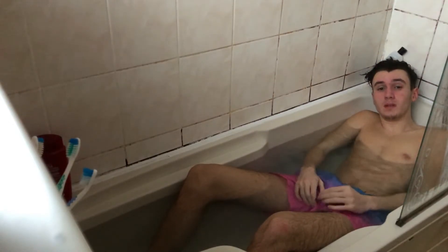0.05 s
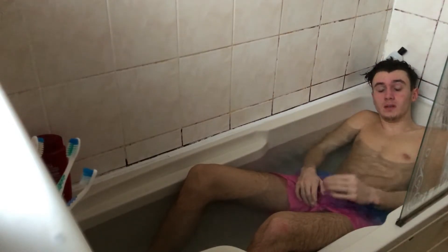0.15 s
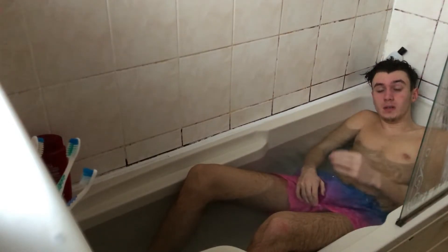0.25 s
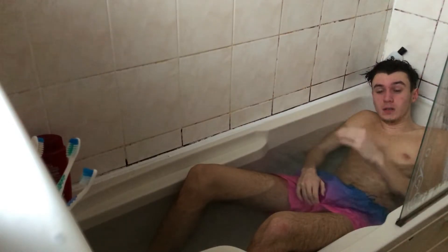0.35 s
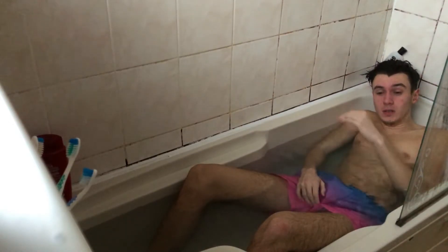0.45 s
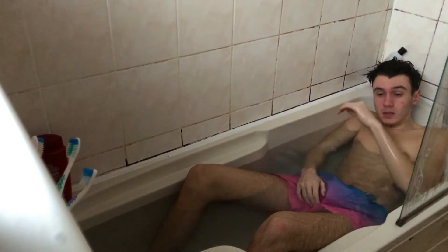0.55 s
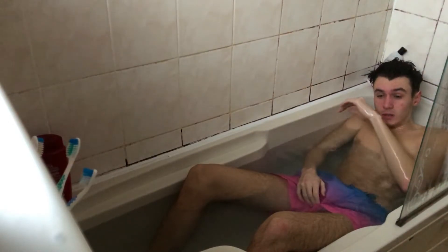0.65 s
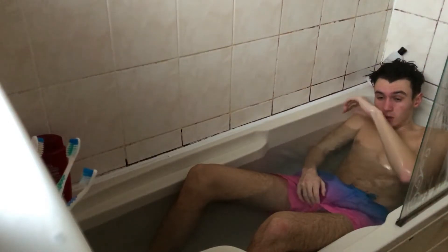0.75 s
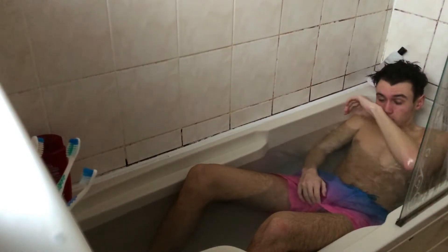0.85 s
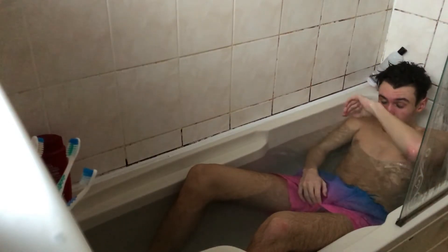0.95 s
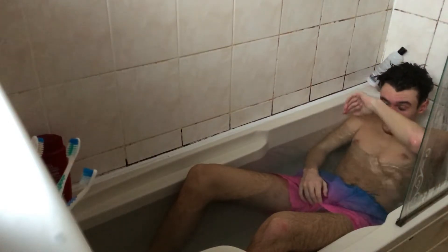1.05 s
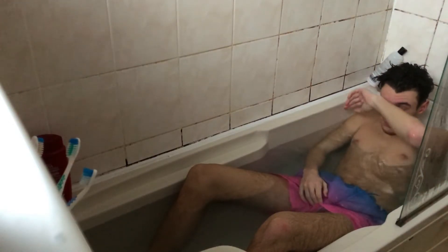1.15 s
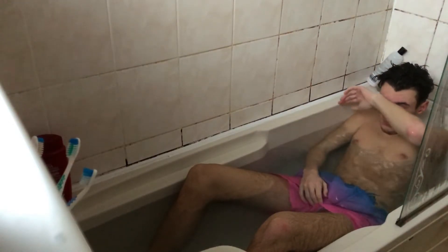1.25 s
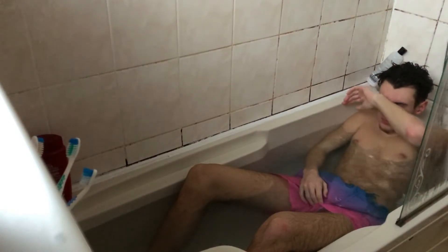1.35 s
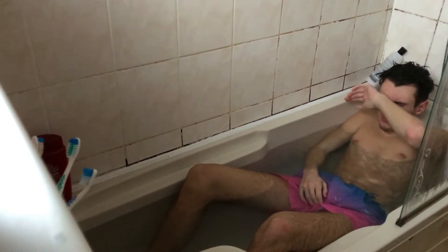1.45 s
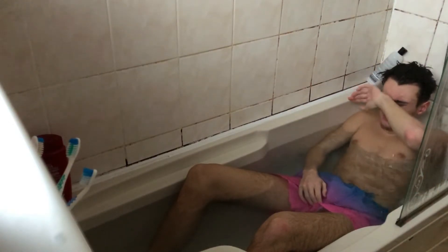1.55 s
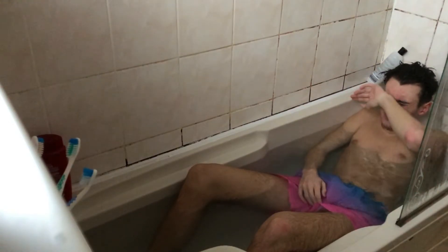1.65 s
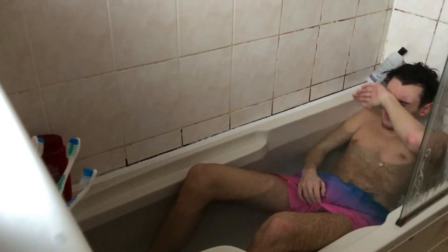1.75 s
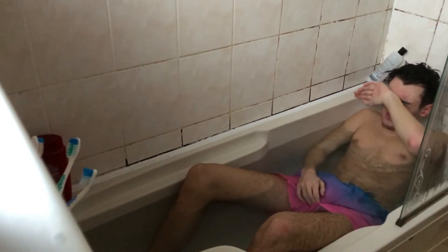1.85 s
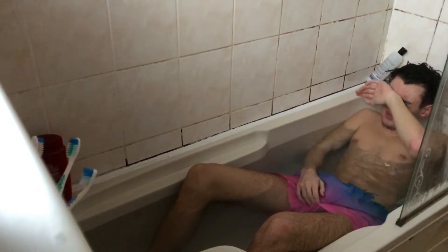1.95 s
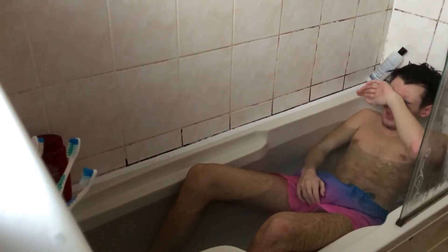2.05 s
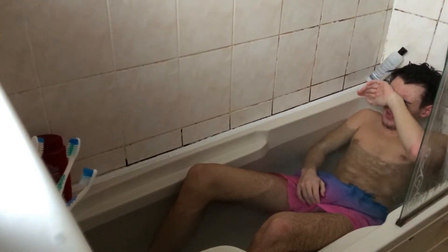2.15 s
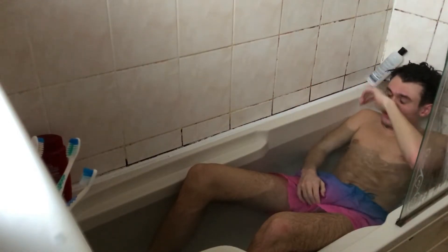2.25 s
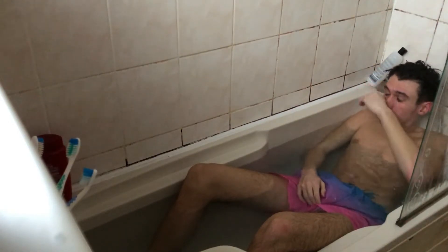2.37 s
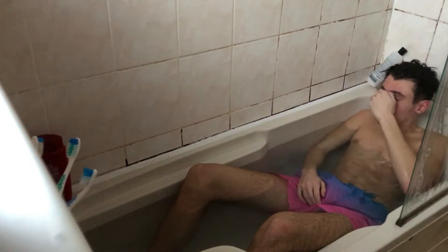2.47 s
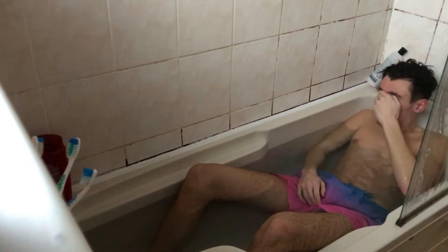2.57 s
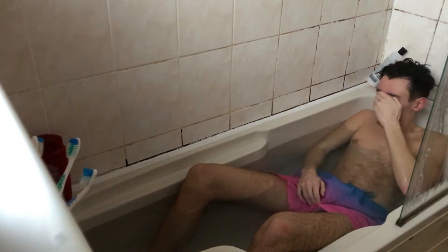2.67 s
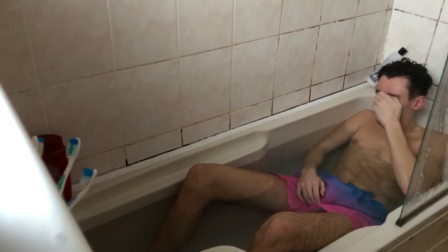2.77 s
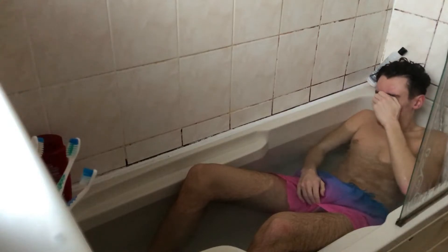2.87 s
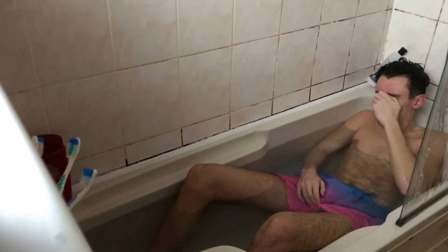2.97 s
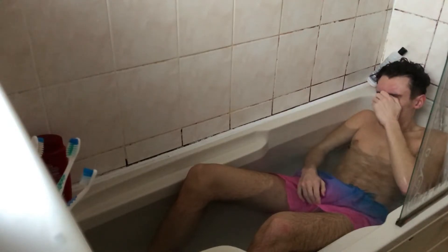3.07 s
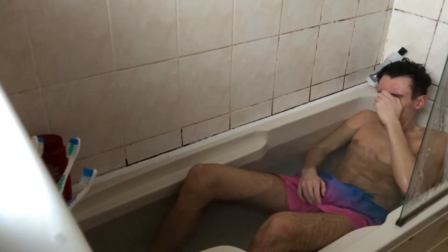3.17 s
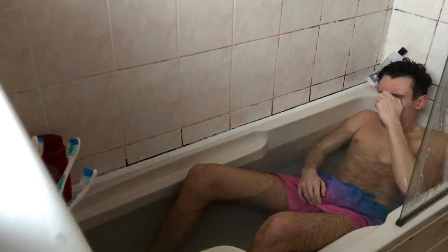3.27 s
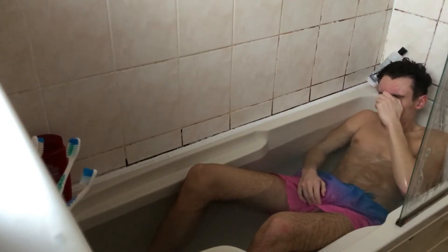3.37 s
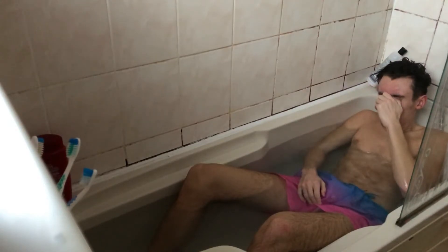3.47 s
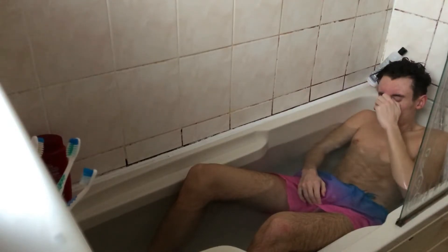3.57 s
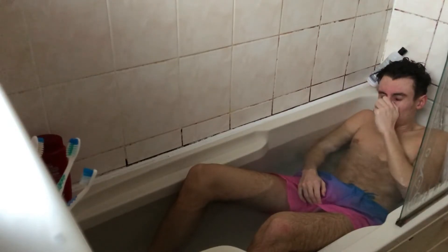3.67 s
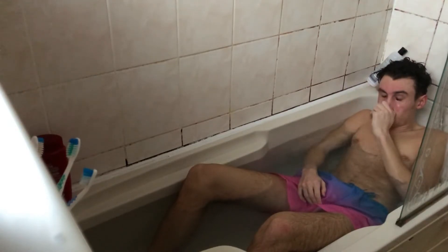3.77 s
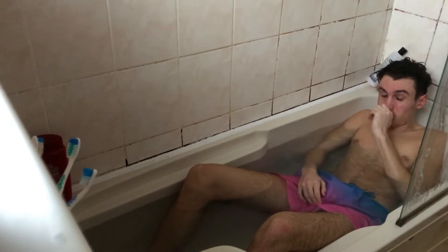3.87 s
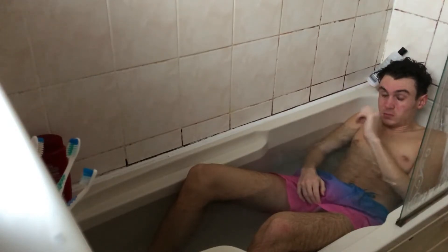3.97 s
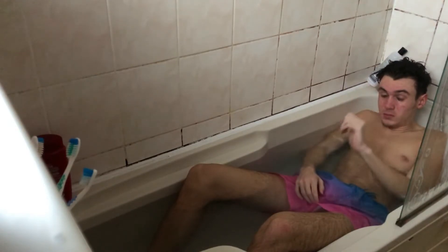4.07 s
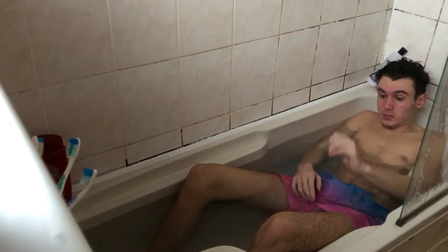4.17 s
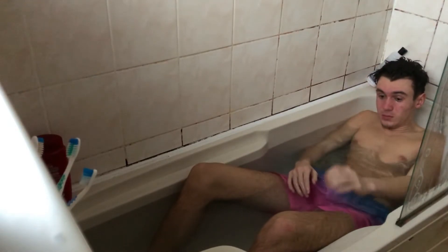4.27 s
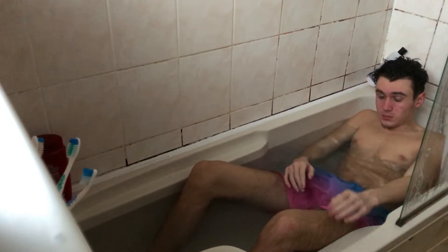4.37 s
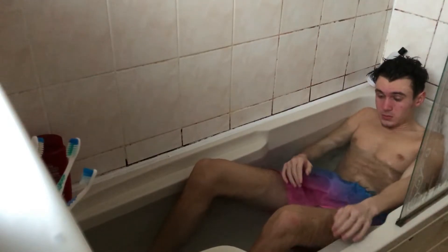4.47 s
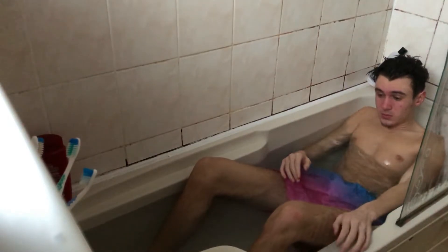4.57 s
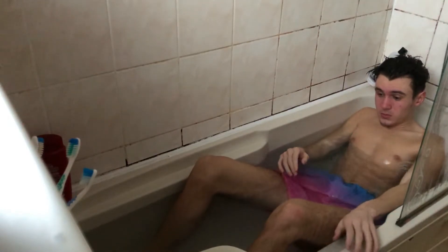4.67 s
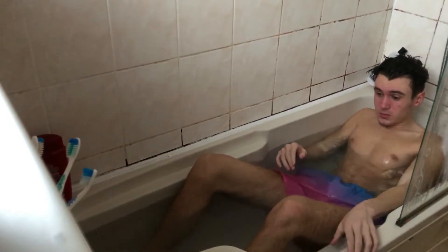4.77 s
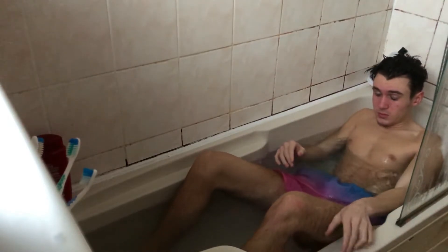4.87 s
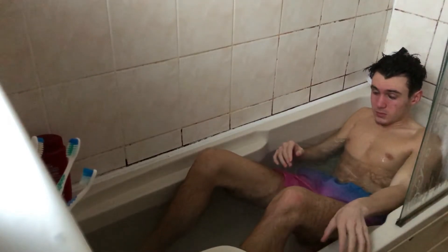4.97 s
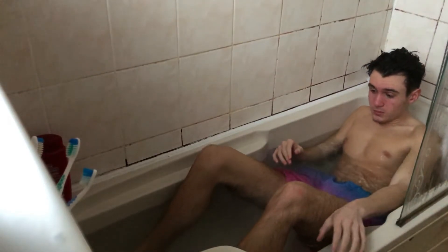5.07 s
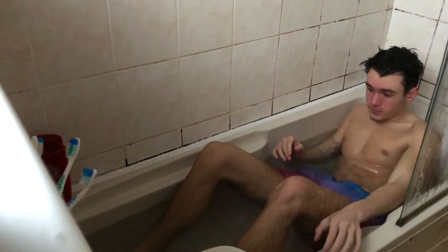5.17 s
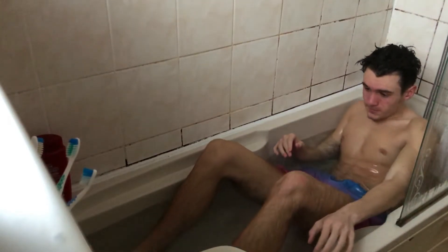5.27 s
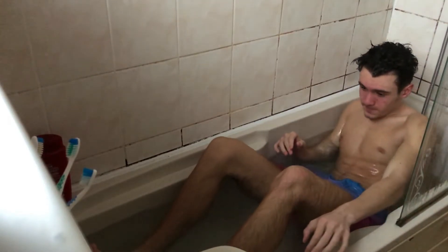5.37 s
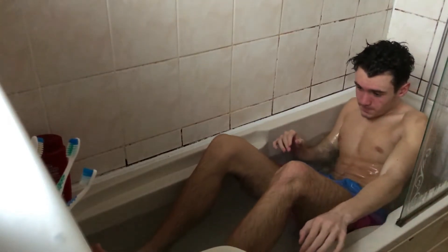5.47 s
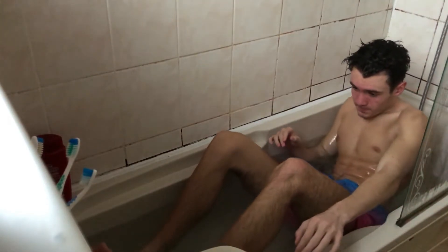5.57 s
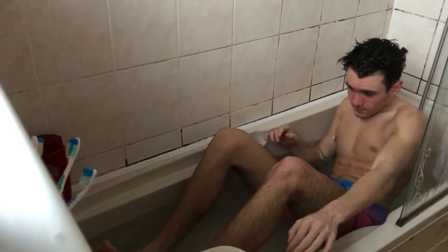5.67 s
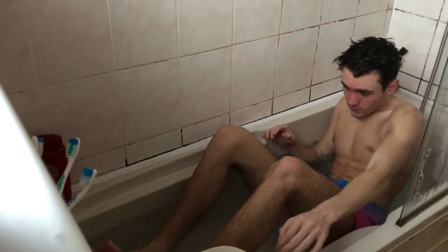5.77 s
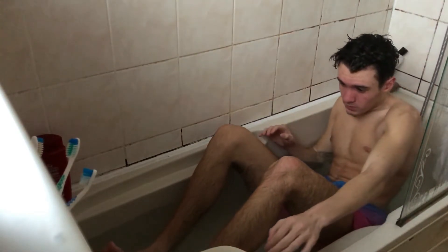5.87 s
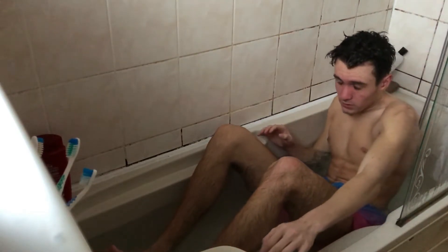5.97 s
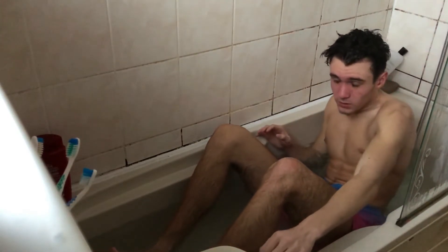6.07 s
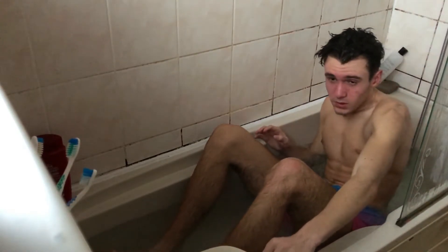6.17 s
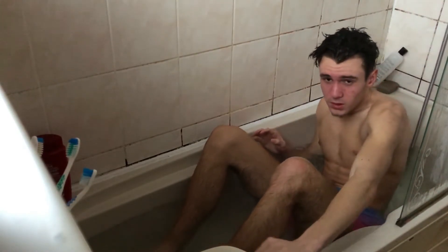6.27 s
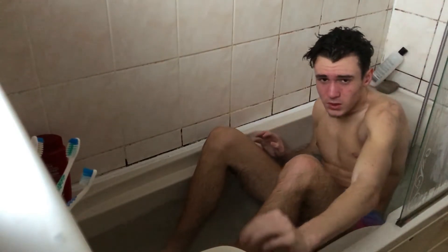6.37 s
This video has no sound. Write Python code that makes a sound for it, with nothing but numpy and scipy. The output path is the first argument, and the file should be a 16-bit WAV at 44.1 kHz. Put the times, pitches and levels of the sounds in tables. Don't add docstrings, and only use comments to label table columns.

```python
import sys
import numpy as np
from scipy import signal
from scipy.fft import rfft, irfft, next_fast_len
from scipy.io import wavfile
from scipy.ndimage import map_coordinates

SR = 44100
rng = np.random.default_rng(int(sys.argv[2]) if len(sys.argv) > 2 else 0)


def generate_wav(sig):
    pcm = np.round(np.clip(np.atleast_2d(sig).T, -1, 1) * 32767).astype(np.int16)
    wavfile.write(sys.argv[1], SR, pcm)


def elevation(decibels):
    levels = np.asarray(decibels, float)
    return 10 ** (levels / 20)


N = 283122


def drips():
    # [t/s, peak level/dB, f/Hz, life/cycles]
    plops = [(0.056, -43.5, 1147, 18), (0.118, -43.5, 1180, 12), (0.253, -45.5, 2010, 11),
             (0.408, -35.5, 1190, 15), (0.476, -39.5, 1047, 23), (0.533, -43.5, 1052, 39),
             (0.99, -45, 896, 11), (1.34, -48.5, 1867, 29), (1.399, -44.5, 980, 5.9),
             (2.52, -56.5, 1425, 15), (3.764, -55, 1820, 13), (4.131, -28, 1394, 6.8),
             (4.249, -40.5, 1250, 22), (4.341, -45, 586, 20), (4.545, -48.5, 753, 12.5),
             (4.62, -50, 760, 9.2), (4.684, -48, 782, 26), (4.798, -42, 1228, 18), (4.859, -46, 531, 13),
             (5.199, -41, 688, 6.3), (5.237, -41.5, 864, 14), (5.575, -52.5, 1810, 31),
             (5.65, -58, 1210, 21), (5.76, -40.5, 1726, 19), (5.826, -47.5, 736, 11),
             (5.86, -38, 1167, 7.9), (5.98, -48.5, 1040, 18), (6.218, -39, 974, 18),
             (6.367, -45, 900, 10.3), (6.393, -43, 730, 12)]
    plinks = [(0.0312, -55, 6200, 12), (0.094, -39.5, 3430, 19), (0.251, -43, 2390, 12.4),
              (0.3071, -41, 3250, 17), (0.352, -43, 3800, 10), (0.3957, -42, 2660, 18),
              (0.562, -40.5, 2130, 14), (0.594, -30.5, 3260, 9.7), (0.6453, -26.5, 3470, 14.2),
              (0.664, -38, 3500, 10), (1.1367, -64, 2100, 22), (1.339, -44, 5200, 18),
              (1.433, -44.5, 6870, 20), (1.634, -55, 3720, 12), (1.6524, -42.5, 5340, 10.5),
              (1.76, -49.5, 4460, 8.9), (1.937, -56, 5500, 14), (2.37, -52, 4520, 12),
              (2.447, -53, 2860, 7.5), (2.504, -41.5, 6070, 14), (2.5387, -51, 4600, 11),
              (3.089, -65, 3400, 16), (3.747, -54, 3480, 11), (3.764, -51, 3610, 12)]
    runoff = [(4.0573, -46.5, 6070, 15), (4.1095, -56, 2950, 11), (4.1246, -32.5, 3930, 19),
              (4.4405, -41.5, 2410, 4.7), (4.56, -43, 3340, 11), (4.585, -35.5, 2790, 11.5),
              (4.599, -38, 3220, 16), (4.681, -42, 2760, 12), (4.859, -47, 4400, 18),
              (4.9836, -48.5, 5730, 15), (5.0588, -50, 3100, 4.4), (5.236, -42, 2750, 17),
              (5.54, -49.5, 3500, 23), (5.6508, -43, 3160, 10.3), (5.7553, -38, 2460, 8.2),
              (5.777, -38.5, 5050, 23), (5.872, -42, 2240, 26), (6.03, -52, 3920, 20),
              (6.213, -45, 3230, 21), (6.331, -56, 2600, 13)]
    hidden = [(.435, -43, 657, 8.9), (.632, -32.5, 1359, 25), (.634, -33, 766, 32.5),
              (.668, -34.5, 5050, 14), (1.057, -57.5, 1760, 24), (1.2, -61, 3500, 15),
              (1.65, -37.5, 651, 29), (1.653, -44, 1900, 6.8), (2.048, -49.5, 5500, 13),
              (3.8, -67, 1870, 8), (4.124, -31.5, 4740, 7), (4.133, -35.5, 1850, 7.9),
              (4.185, -42, 5600, 7.2), (4.19, -46, 760, 13), (4.573, -39, 4050, 9.1),
              (5.2366, -45, 1930, 17), (5.3, -46, 580, 11), (5.575, -46.5, 5100, 12), (5.61, -47, 6100, 14),
              (5.63, -50, 233, 10.5), (5.652, -38.5, 5100, 5.2), (5.767, -50.5, 3500, 29),
              (6.344, -43.5, 4380, 13), (6.388, -32, 246, 6.3)]
    patter = [(0.068, -46, 1070, 11.5), (.15, -50, 4700, 16), (0.4466, -43.5, 1125, 18),
              (.472, -49, 3700, 12), (0.489, -46, 2270, 14), (.585, -36, 2770, 13.6),
              (.615, -50, 2800, 9.2), (.627, -43, 3500, 11), (.679, -31, 3380, 13), (1.344, -44, 4540, 17),
              (1.341, -44, 6250, 14), (1.414, -46, 850, 5.2), (1.424, -55, 694, 6.3),
              (1.666, -46.5, 673, 25), (1.684, -45, 632, 38), (2.478, -53, 4170, 14),
              (2.522, -52, 4500, 12), (4.083, -57.5, 1980, 14), (4.209, -44, 3380, 13),
              (4.245, -41, 2180, 8.1), (4.585, -46.5, 7350, 14), (4.618, -46, 3120, 15),
              (4.692, -47, 1040, 9.2), (4.826, -44, 820, 16), (5.02, -52, 600, 9.3), (5.075, -48, 700, 9),
              (5.212, -37.5, 767, 6.2), (5.225, -38, 700, 6), (5.2202, -43, 2080, 6.7),
              (5.2344, -42, 1670, 17), (5.245, -37, 3010, 16), (5.256, -42, 876, 15.5),
              (5.258, -38.5, 2090, 9.5), (5.262, -48, 3830, 15), (5.28, -45, 4800, 16),
              (5.294, -53, 920, 14), (5.297, -44, 2300, 14), (5.335, -60, 945, 8.4), (5.365, -43, 3770, 20),
              (5.43, -46, 4900, 14), (5.506, -55, 1850, 13), (5.663, -48.5, 3900, 14),
              (5.678, -48, 3050, 14), (5.782, -40, 2750, 6.7), (5.79, -44, 5930, 13),
              (5.839, -41, 4790, 15), (5.8739, -39.5, 1177, 11), (5.927, -49, 4800, 22),
              (5.944, -45, 2600, 6.3), (6.02, -54, 2280, 13)]
    scattered = [(.06, -44.5, 4600, 6.6), (.098, -50, 3150, 20), (.128, -55, 3400, 16), (.15, -55, 2150, 14),
                 (.16, -50, 3330, 14), (.175, -53, 2600, 14), (.2, -53, 1510, 12), (.215, -61, 1250, 8.3),
                 (.272, -55, 3950, 12), (0.329, -54, 2830, 14), (.385, -47, 6700, 8.7),
                 (.632, -31.5, 5800, 10), (.643, -44, 3080, 11), (0.651, -40, 3900, 10),
                 (.665, -40, 1020, 18), (.69, -37, 3850, 12), (0.726, -44, 3200, 12), (.74, -41, 3700, 15),
                 (.755, -48, 3450, 12), (1.338, -50, 7400, 12), (1.343, -50.5, 3480, 33),
                 (1.352, -44.5, 3930, 14), (1.432, -57, 3340, 22), (1.908, -67, 2400, 10),
                 (2.582, -47, 2810, 9.3), (3.74, -58, 1730, 11), (3.769, -50, 2500, 8), (3.78, -61, 3020, 8),
                 (3.855, -57, 2600, 4.7), (4.113, -54, 4200, 10), (4.134, -44, 830, 4.5),
                 (4.16, -41, 955, 7), (4.19, -44, 3900, 14), (4.205, -50, 900, 8), (4.282, -47, 1305, 31),
                 (4.646, -46.5, 870, 11), (4.683, -35, 4500, 3.3), (4.719, -50.5, 1780, 12),
                 (4.75, -52, 2960, 16), (4.87, -44, 1050, 8.1), (4.912, -50, 2770, 6.7),
                 (4.918, -48, 1146, 11), (4.941, -54, 1080, 11), (5.056, -46.5, 1660, 7.8),
                 (5.795, -44, 3550, 15), (5.956, -48, 2120, 13), (6.128, -51, 3700, 10),
                 (6.28, -48.5, 1027, 30)]
    lone = [
        (1.056, -57, 2820, 26),
        (1.135, -57, 3520, 22),
        (1.199, -59, 3130, 34),
    ]
    # [t/s, peak level/dB, f/Hz]
    ticks = [(0.0467, -38, 12700), (0.172, -33, 14800), (0.402, -43, 12700), (0.575, -50, 7790),
             (0.8918, -36, 11500), (1.277, -39, 14100), (1.3592, -34, 12300), (1.7167, -35, 9000),
             (1.871, -39.5, 9250), (1.923, -39, 12100), (2.354, -32.5, 10200), (3.3936, -62, 13800),
             (3.559, -52, 11300), (4.0878, -37, 14100), (4.125, -35.5, 11500), (4.345, -18, 14800),
             (4.572, -45, 7400), (4.7552, -40, 8400), (5.0402, -35.5, 7300), (5.539, -47, 8930),
             (5.7581, -38.5, 7320), (5.9448, -44, 9250), (5.9657, -47, 8250), (5.9874, -38.5, 10300),
             (6.1508, -36, 11900), (6.2137, -39, 9400), (6.2775, -49, 7000), (6.3628, -43, 11500)]

    tick_cycles, heavy_hz, spots = 8.5, 400, 5
    droplets = np.insert(np.array(ticks, float), 3, tick_cycles, axis=1)
    rows = np.vstack([plops, plinks, runoff, droplets, hidden, patter, scattered, lone])
    s, db, hz, cycles = rows.T
    rise = 12 * 0.014 * (12 / cycles) / (1 + (heavy_hz / hz) ** 4)
    rows = np.column_stack([s, db, hz, rise, cycles])
    return sum(tiles(bubbles(rows[k::spots], size=3000), 2.5, 4) for k in range(spots))


def sweeps():
    # [t/s, peak level/dB, first f/Hz, last f/Hz, length/s]
    cavities = [
        (0.587, -37, 2940, 3650, 0.0046),
        (1.651, -43.5, 640, 940, 0.0316),
        (2.009, -40.5, 1136, 3430, .059),
        (2.58, -46, 2476, 3390, 0.012),
        (4.5985, -35.5, 2660, 4752, 0.0053),
    ]
    held_per_s, thins_db = 5.2, 11.5
    dry = np.zeros(N)
    for s, db, first_hz, last_hz, length_s in cavities:
        u = np.linspace(0, 1, round(length_s * SR))
        held = held_per_s * length_s
        shrunk = np.clip((u - held) / (1 - held), 0, 1)
        hz = first_hz * (last_hz / first_hz) ** shrunk ** 1.2
        strength = elevation(db - thins_db * np.sqrt(shrunk)) * signal.windows.tukey(len(u), .2)
        dry[round(s * SR):][:len(u)] += strength * np.sin(2 * np.pi * np.cumsum(hz) / SR)
    return tiles(dry, 1.4, 0.89, loss_db=6.5)


def slaps():
    # [t/s, peak level/dB, dull share/0-1]
    sheets = [(0.057, -36.5, 0.5), (0.405, -31.5, 0.53), (0.5955, -24.5, 0.26), (0.634, -22.5, 0.45),
              (1.335, -39, 0.01), (1.403, -42, 0.6), (1.6497, -33, 0.38), (2.0092, -31, 0.79),
              (2.455, -41.5, 0.01), (3.764, -57, 0.4), (4.1288, -35, 0.1), (4.3385, -27, 1),
              (4.444, -57, 0.7), (4.572, -42, 0), (4.682, -25.5, 0.7), (5.055, -31, 0.55), (5.651, -48, 1),
              (5.754, -34, 0.5), (6.226, -33, 0.64)]
    # [t/s, peak level/dB]
    sprays = [(0.172, -59), (0.577, -45), (0.8905, -58), (2.352, -47.5), (2.446, -47), (2.529, -52),
              (3.555, -55.5), (3.65, -63), (4.0895, -49), (4.338, -35), (5.948, -52)]
    slap_s, spray_s = 0.0045, 0.0022
    dry = np.zeros(N + SR)
    t = np.arange(SR // 20) / SR
    for s, db, dull in sheets:
        noise = rng.standard_normal(len(t)) * elevation(db - 9 - 20 * t / slap_s)
        sharp = passed(noise, "high", hz=860)
        dry[round(s * SR):][:len(t)] += (1 - dull) * sharp + 2 * dull * passed(sharp, "low", hz=3500)
    for s, db in sprays:
        noise = rng.standard_normal(len(t)) * elevation(db + 4.5 - 20 * t / spray_s)
        dry[round(s * SR):][:len(t)] += passed(noise, "high", hz=7000)
    return tiles(dry[:N], -2.5, 4)


def stir():
    surges = [(.09, -60.5, -5, 0.054, 0.41), (.41, -54.5, 1.5, 0.42, 0.76), (.655, -45, -0.5, 0.074, 0.26),
              (.9, -59.5, 9, .01, 0.26), (1, -63.5, 2, .15, 0.26), (1.35, -62.5, 17.5, .01, 0.25),
              (1.66, -64, -6.5, 0.017, 0.12), (1.72, -69, 14, 0.043, .3), (1.885, -77, 12, .01, .25),
              (2.1, -73.5, 9, .25, 1.4), (2.362, -67, 22, 0.013, 0.37), (2.58, -70, 1.5, 1, 0.11),
              (3.775, -62.5, 3.5, 0.087, 0.098), (4.14, -56.5, 2, 0.017, 0.35), (4.3, -58, 6, 0.25, 0.054),
              (4.35, -50, 4.5, 0.024, 0.19), (4.59, -57.5, 2, 0.11, 0.42), (4.87, -60, 5.5, 0.58, 0.32),
              (5.06, -60, -4, 0.025, 0.22), (5.27, -48, 1, 0.05, 0.22), (5.35, -48.5, 3.5, 0.35, 0.26),
              (5.67, -65.5, 14, 0.5, 0.29), (5.768, -56.5, 3.5, 0.02, 0.55), (5.955, -54, 0.5, 0.031, 0.24),
              (6.36, -59.5, 0, 0.83, 1.1)]
    calm_db = -84
    gurgle = elevation(-1) * swells(surges, lean=-1.6, rest_db=calm_db + 1.5)
    trickle = elevation(-4) * swells(surges, lean=-0.071, rest_db=calm_db)
    fizz = elevation(-9.5) * swells(surges, lean=0.7, rest_db=calm_db + 9.5)
    water = gurgle * swarm(count=900, mid_hz=1107, spread=0.4107, cycles=10)
    water += trickle * swarm(count=2500, mid_hz=3635, spread=0.417, cycles=9.1)
    water += fizz * elevation(-4.5) * swarm(count=2500, mid_hz=14800, spread=0.096, cycles=7.8)
    water += fizz * elevation(-3.5) * swarm(count=6000, mid_hz=12000, spread=0.416, cycles=2.8)
    return water


def tub():
    heaves = [(.16, -58, 9.5, 0.16, 0.23), (.37, -51, 3.5, 0.12, 0.13), (.57, -55.5, -4, 0.35, 1.87),
              (1.43, -48, -18, 0.087, 0.16), (3.79, -63.5, 1.5, 0.16, 0.11), (4.22, -47, -14, 0.12, 0.11),
              (4.36, -40.5, -14, 0.083, 0.28), (4.45, -47, -2.5, 0.091, 0.1), (4.64, -47, -9, 0.17, 0.29),
              (4.8, -56, -9, 0.062, 0.15), (4.91, -39, -6, 0.27, 0.094), (5.1, -49, -5, 1.4, 2.7),
              (5.61, -56.5, 6, 0.1, 0.047), (5.93, -45, -0.5, 0.1, 0.09), (6.22, -54, -0.5, 0.24, 0.15),
              (6.41, -35.5, -3, 0.033, .3)]
    # [f/Hz, width/Hz, level/dB]
    deep_modes = [(71, 24, -9.5), (100.7, 14.7, -0.5)]
    # [f/Hz, width/Hz, level/dB]
    hollow_modes = [(159, 6.9, -1.5), (188.6, 29, 9.5), (254, 38, 6), (295.7, 20, 0), (420, 13, -39)]
    deep = swells(heaves, lean=1, rest_db=-79) * coloured(lambda f: resonance(deep_modes, f))
    hollow = swells(heaves, lean=0, rest_db=-67) * coloured(lambda f: resonance(hollow_modes, f))
    lumps = elevation(1.94 * wobble(12))
    return lumps * elevation(-4) * (deep + hollow)


def bumps():
    # [t/s, peak level/dB, f/Hz, life/cycles]
    knocks = [(0.117, -42, 192, 2), (0.346, -44, 182.4, 4.7), (0.646, -41.5, 271, 5),
              (1.417, -43, 147, 8.6), (3.765, -49, 99, 4.4), (3.854, -61, 168, 4.8),
              (4.194, -38.5, 142, 6.5), (4.345, -26, 302, 3.1), (4.362, -30, 330, 4.5),
              (4.385, -34.5, 294, 5), (4.741, -34.5, 317, 4.1), (4.765, -32.5, 182, 8.1),
              (4.791, -32.5, 302, 5.5), (4.855, -34, 207, 4.5), (4.862, -31.5, 373, 4.6),
              (4.885, -35, 190.5, 5.6), (4.943, -35, 270, 5), (4.99, -42, 300, 5.4), (5.076, -38, 280, 6.5),
              (5.091, -44, 198, 4), (5.191, -28.5, 159, 2.9), (5.9, -40.5, 213, 5.2),
              (6.095, -45.5, 333, 4.3), (6.208, -45, 114, 10), (6.241, -51, 110, 3.2),
              (6.25, -46.5, 283, 6.6), (6.385, -21, 155, 4.2)]
    rows = np.insert(np.array(knocks), 3, 0, axis=1)
    return tiles(bubbles(rows, size=5000), -0.8, 1.8)


def hush():
    # [f/Hz, density/dB per Hz]
    hiss_curve = [(20, -39), (40, -10), (75, -8.5), (110, -10.5), (180, -9), (300, -13), (450, -16.5),
                  (860, -24), (1500, -28), (3000, -31.5), (8000, -32.5), (12000, -34.5), (16000, -33.5)]
    fan_hz, fan_width_hz, fan_db, hiss_db = 177, 6, -69, -71
    hum = coloured(lambda hz: 1 / (1 + ((hz - fan_hz) / fan_width_hz) ** 2))
    hiss = coloured(lambda hz: elevation(along(hiss_curve, hz)))
    return elevation(hiss_db) * hiss + elevation(fan_db) * hum


def tiles(x, direct_db, wet_db, loss_db=6):
    # [f/Hz, t60/s]
    decay = [(150, 0.36), (700, 0.41), (3000, 0.37), (8000, 0.61), (15000, 0.19)]
    hz, t, z = signal.stft(rng.standard_normal(SR * 2 // 3), SR, nperseg=256)
    spill_db = -loss_db / (1 + np.exp((.08 - t) / 0.042))
    decay_db = -60 * t / along(decay, hz)[:, None]
    tail = signal.istft(z * elevation(spill_db + decay_db), SR, nperseg=256)[1]
    tail = tail * (1 - np.exp(-np.arange(len(tail)) / SR / .002))
    direct = passed(x, "low", hz=10500)
    wet = signal.fftconvolve(x, tail / np.linalg.norm(tail))[:N]
    return elevation(direct_db) * direct + elevation(wet_db) * wet


def bubbles(rows, size):
    s, db, hz, rise, cycles = np.transpose(rows)[:, :, None]
    t = np.arange(size) / SR
    age = t * hz / np.maximum(cycles, 1)
    phase = 2 * np.pi * hz * t * (1 + rise * (np.minimum(age, 2) / 2 - .3))
    audible = hz * (1 + rise * age) < SR / 2
    swell = 1 - np.exp(-(t * hz / (1 + .05 * cycles)) ** 2)
    ring = elevation(db - 20 * age) * swell * np.sin(phase) * audible
    where = np.round(s * SR).astype(int) + np.arange(size)
    return np.bincount(where.ravel(), ring.ravel(), N + SR)[:N]


def swarm(count, mid_hz, spread, cycles):
    draw = rng.random((count, 2))
    s, db = draw[:, 0] * N / SR, -9 * draw[:, 1]
    hz = mid_hz * np.exp(spread * (np.abs(rng.standard_normal(count) + 1.6) - 1.6))
    rows = np.column_stack([s, db, hz, np.full(count, .25), np.full(count, cycles)])
    return unit(tiles(bubbles(rows, size=int(6.8 * cycles / mid_hz * SR)), -1.4, 0))


def swells(rows, lean, rest_db):
    hop = 256
    s, db, colour_db, rise, fall = np.transpose(rows)[:, :, None]
    t = np.arange(0, N + hop, hop) / SR - s
    level_db = db + lean * colour_db - 20 * np.maximum(-t / rise, t / fall)
    power = elevation(2 * level_db).sum(axis=0) + elevation(2 * rest_db)
    return np.interp(np.arange(N), np.arange(len(power)) * hop, np.sqrt(power))


def resonance(modes, f):
    return sum(elevation(db) * 1j * f * w / (c * c - f * f + 1j * f * w) for c, w, db in modes)


def coloured(response):
    m = next_fast_len(N)
    spectrum = rfft(rng.standard_normal(m)) * response(np.fft.rfftfreq(m, 1 / SR))
    return unit(irfft(spectrum, m)[:N])


def wobble(rate_hz):
    knots = rng.standard_normal(int(N * rate_hz / SR) + 4)
    return map_coordinates(knots, [np.arange(N) * rate_hz / SR])


def along(points, hz):
    f, v = np.transpose(points)
    return np.interp(np.log(hz + 1), np.log(f + 1), v)


def passed(x, kind, hz):
    return signal.sosfilt(signal.butter(2, hz, kind, fs=SR, output="sos"), x)


def unit(x):
    return x / np.sqrt(np.mean(x ** 2) + 1e-20)


def scene():
    return (drips() + sweeps() + slaps() + stir() + tub() + bumps() + hush())[None]


def band_limit(x):
    return signal.sosfilt(signal.butter(12, 16620, fs=SR, output="sos"), x)


def record(dry):
    low_hz, top_hz = 38.2, 15900
    spectrum = rfft(passed(dry, "high", hz=low_hz))
    kept = irfft(spectrum * (np.fft.rfftfreq(N, 1 / SR) < top_hz), N)
    return band_limit(kept)


dry = scene()
out = record(dry)
generate_wav(out)
```